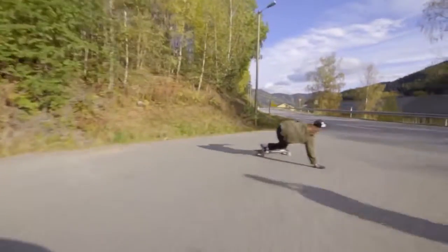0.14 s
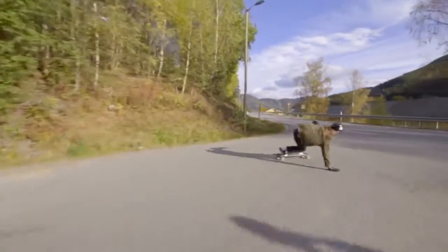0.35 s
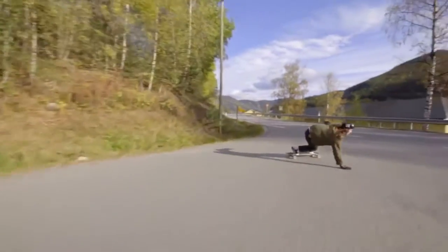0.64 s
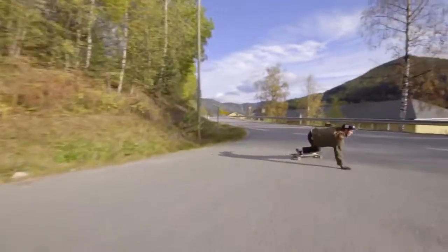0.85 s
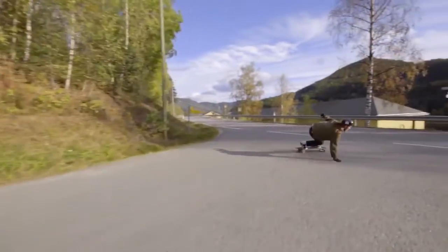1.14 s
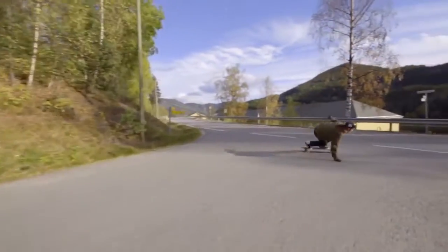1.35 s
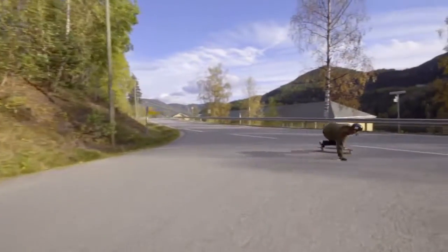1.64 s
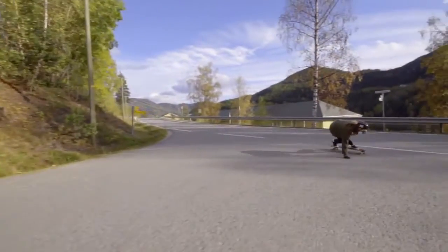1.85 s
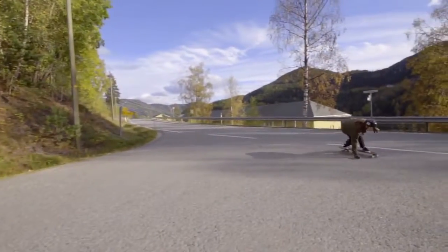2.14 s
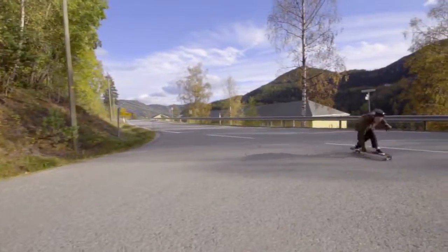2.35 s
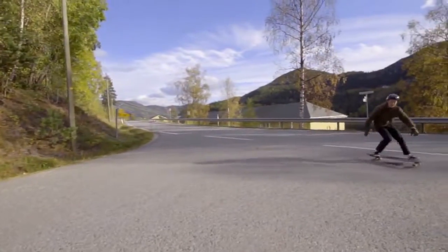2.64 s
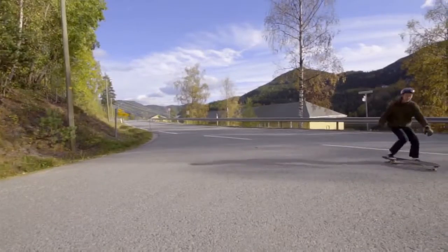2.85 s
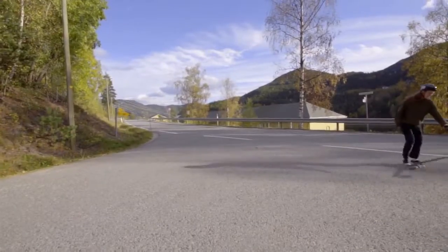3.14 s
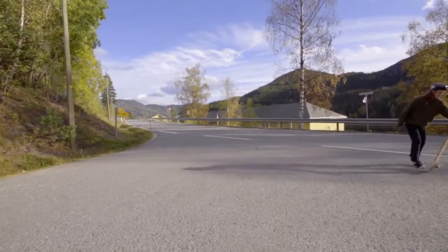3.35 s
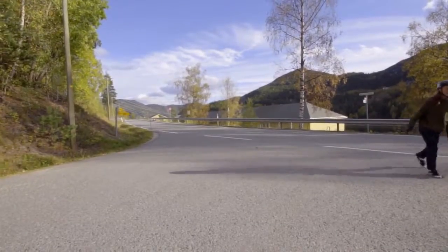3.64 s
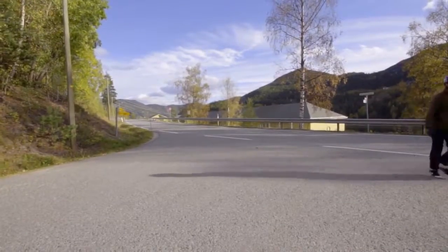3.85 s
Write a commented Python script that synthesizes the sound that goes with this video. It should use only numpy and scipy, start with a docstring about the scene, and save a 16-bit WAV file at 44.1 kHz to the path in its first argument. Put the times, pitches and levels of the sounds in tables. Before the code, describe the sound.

Longboard wheels hiss and crackle on gritty asphalt under strong wind buffeting close to the microphone; braking rubber groans, rolling stops near two seconds, then small clicks and wooden deck knocks over a low idling engine.

```python
"""Wind buffets two microphone ports separately: turbulent noise in lumps, with a few lone pops on the right.
Wheels of a longboard hiss and crackle over gritty asphalt, as resonated noise with crushed-grit bursts,
until they come to rest near 2 s; braking rubber groans as narrow-band noise. A few sharp struck clicks sound
during the rolling; more clicks and the deck knocks come after it, as the rider steps off.
Behind all of it an engine idles: harmonics of its firing rate and pulsing noise."""
import sys
import numpy as np
from scipy import signal
from scipy.fft import rfft, irfft
from scipy.io import wavfile
from scipy.ndimage import uniform_filter1d

SR = 44100
rng = np.random.default_rng(int(sys.argv[2]) if len(sys.argv) > 2 else 0)


def magnitude_from_level(level_db):
    """Linear magnitude for a level in decibels (20 dB per decade)."""
    exponent = np.asarray(level_db, float) / 20
    return 10 ** exponent


def to_wav(s):
    """Save 16-bit WAV."""
    ch = np.atleast_2d(s).T  # columns
    pcm = np.round(np.clip(ch, -1, 1) * 32767)  # PCM
    wavfile.write(sys.argv[1], SR, pcm.astype(np.int16))


N = 176400

# Wind strength at each port: time_s, level_db
WIND_LEFT = [(0, -20.5), (.03, -18), (.07, -15.5), (0.079, -25.5), (0.178, -19), (.27, -22.5), (.3, -30),
             (.34, -22.5), (.39, -30), (.43, -25.5), (.5, -28.5), (.54, -49), (0.582, -28), (.63, -55),
             (0.667, -26), (.71, -60.5)]
WIND_RIGHT = [(0, -37), (.35, -33), (.38, -34), (.46, -31.5), (.562, -40), (0.57, -28.5), (.66, -32),
              (.72, -37.5), (.8, -33), (.93, -36), (1.03, -39), (1.11, -38.5), (1.25, -46), (1.6, -43),
              (1.85, -52), (2.4, -79)]
# Relative spectrum of the wind at each port: frequency_hz, density_db
GUST_LEFT = [(20, -32.5), (130, -1), (180, -3.5), (450, -3.5), (800, -9.5), (1700, -23), (5000, -45),
             (9000, -83)]
GUST_RIGHT = [(20, -23.5), (130, -0.5), (300, 3), (450, -2.5), (750, -11), (1150, -27), (2500, -73)]
# Turbulent lumps, left row then right: rate_per_s, spread_db, brightening_db_per_db
EDDIES = [(150, 2, 0.19), (101, 2.5, 0.56)]
# Single strong eddies at the right port: centre_s, peak_db, pitch_hz
POPS = [(0.012, -16, 437), (0.028, -15.5, 417), (.057, -13, 436), (0.157, -21, 303), (0.251, -18, 310),
        (0.298, -16.5, 360), (0.308, -16.5, 366), (.592, -24, 700)]
# Strength of the rolling wheels: time_s, middle_level_db, treble_level_db
ROLL = [(0, -45, -57.5), (.45, -46, -55.5), (.8, -48.5, -57), (.86, -50.5, -58.5), (.93, -47, -59),
        (1.03, -50.5, -61), (1.09, -53, -62.5), (1.3, -55, -61.5), (1.5, -49.5, -61.5),
        (1.72, -56.5, -64.5), (1.92, -53, -59.5), (2.05, -72, -72)]
# Relative response of the wheels in the middle and in the treble: frequency_hz, gain_db
ROLL_MID = [(470, -33), (800, -22), (1150, -15), (1760, 2), (2270, -9.5), (2780, -3.5), (3490, -12.5),
            (4940, -67)]
ROLL_TOP = [(2060, -37), (3500, 2), (5640, -7), (7430, -13), (8690, -6.5), (10100, -13.5), (14000, -15),
            (15700, -19.5)]
# Port differences for wheels and clicks: frequency_hz, left_minus_right_db, left_lead_rad, likeness_0_to_1
ROLL_PORTS = [(800, -3, -1.4, 0.55), (2000, -0.5, -0.5, 0.63), (3500, -3, -3, 0.92),
              (5900, -11, -2.5, 0.44), (9000, -9, -2.5, 0.6), (15000, -11.5, -6.5, 0)]
# Centres of the grit bands: frequency_hz
GRIT_HZ = (1500, 2180, 3980, 7040, 11900)
# Groan of braking rubber: time_s, centre_hz, level_db
GROAN = [(1.3, 334, -60.5), (1.48, 318, -45.5), (1.66, 410, -53.5), (1.74, 400, -46.5), (1.85, 460, -44.5),
         (1.96, 420, -49.5), (2.05, 447, -60)]
# Clicks and knocks, before the port differences: start_s, peak_db, centre_hz, width_hz, length_s, left_lean_db
KNOCKS = [(0.49, -38, 5200, 3000, 0.006, -2.5), (1.084, -31, 5500, 5000, 0.0043, 10.5),
          (1.176, -49.5, 8640, 1200, .016, -2.5), (1.331, -37.5, 2900, 2000, 0.014, 5),
          (2.14, -53, 2880, 600, .003, 2), (2.156, -48.5, 2920, 450, 0.0044, 0),
          (2.198, -48.5, 9000, 1800, 0.004, -3), (2.2, -44, 3470, 2000, 0.015, 1),
          (2.223, -41, 4010, 800, 0.019, 2), (2.623, -45, 6400, 2000, 0.0044, 22.5),
          (3.305, -38, 1710, 1400, 0.0098, -2.5), (3.455, -43, 2600, 2800, 0.047, -2),
          (3.588, -37.5, 1420, 800, 0.018, 0)]
# Knocks on the wooden deck: start_s, peak_db
THUDS = [(3.461, -33), (3.469, -32), (3.485, -40), (3.515, -36), (3.591, -38)]
# Modes of the deck: pitch_hz, mean_relative_level_db, t60_s
DECK = [(280, -9, 0.05), (632, 1.5, 0.027), (1110, -4, 0.016), (2090, -19, 0.025)]
# Firing rate of the engine: time_s, rate_per_s
FIRING = [(0, 30.18), (2.3, 30.15), (2.55, 29.19), (2.8, 28.4), (3.1, 27.94), (4, 27.83)]
# Strength of the engine: time_s, hum_level_db, body_level_db, clatter_level_db
ENGINE = [(0, -60, -41.5, -55), (1.2, -59, -54, -57.5), (2.3, -58.5, -52, -57), (3.2, -55.5, -50.5, -56),
          (3.96, -57, -49, -55)]
# Partials of the hum: multiple_of_firing_rate, relative_level_db, lead_rad
ORDER = [(1, -23, 1.9), (2, 0, 2.7), (3, -7, 0), (9, -12, 2.4), (12, -9, 2.4)]
# Relative spectra of the engine noises: frequency_hz, gain_db
BODY = [(53, -31), (90, -4), (167, -14), (337, -5), (420, -4.5), (589, -2.5), (900, -16), (1170, -45)]
CLATTER = [(440, -12), (750, -8.5), (1080, -1), (1690, -11), (2000, -7.5), (2290, -13), (4300, -20.5),
           (5590, -52)]
HISS = [(3000, -45), (4400, -2), (6400, 0), (8300, -8), (13000, -12.5), (15800, -32)]
# Swell of each engine noise, one row: place_in_cycles, mean_depth_db, depth_spread_db
BODY_BEAT = (0.3, 3.5, .9)
CLATTER_BEAT = (0.16, 5.6, 1.5)
HISS_BEAT = (.17, 2.9, 1.)
# Port differences for the engine noises: frequency_hz, left_minus_right_db, left_lead_rad, likeness_0_to_1
ENGINE_PORTS = [(60.4, 0, 1, 0.99), (700, 2.5, -0.84, 1), (1260, 1, 0, 0.47), (2280, 0, -2.5, 0.87),
                (4400, -3, -2, 0.29), (14900, -2, -0.5, 0.089)]

SOFT_S, STRIKE = 0.0008, 5  # soft onset of a contact; strength of the strike against unit noise


def evened(x):
    """Normalisation: divides a signal by its effective value, giving rms 1."""
    return x / np.sqrt(np.mean(x ** 2) + 1e-20)


def over_time(rows):
    """Linear interpolation of breakpoint columns in time, one value per sample."""
    time_s, *columns = np.transpose(rows)
    return [np.interp(np.arange(N) / SR, time_s, column) for column in columns]


def over_hz(rows):
    """Interpolation of spectral columns on a logarithmic frequency axis, one value per bin."""
    hz, *columns = np.transpose(rows)
    bins = np.log(np.fft.rfftfreq(N, 1 / SR) + 1)
    return [np.interp(bins, np.log(hz + 1), column) for column in columns]


def coloured(x, spectrum):
    """Linear filtering: multiplies the spectrum by a gain curve; rms 1."""
    gain = magnitude_from_level(over_hz(spectrum)[0])
    return evened(irfft(rfft(x) * gain, N))


def lumps(smooth):
    """Low-pass random process: noise averaged twice over so many samples; rms 1."""
    once = uniform_filter1d(rng.standard_normal(N), int(smooth))
    return evened(uniform_filter1d(once, int(smooth)))


def ports(x, rows):
    """Partial coherence: two ports differ in level, phase and likeness; their mean has rms 1."""
    pan_db, lead, likeness = over_hz(rows)
    likeness = np.clip(likeness, 0, 1)
    a, b = rfft(x)
    left = a * magnitude_from_level(pan_db / 2) * np.exp(1j * lead)
    right = (likeness * a + np.sqrt(1 - likeness ** 2) * b) * magnitude_from_level(-pan_db / 2)
    pair = irfft([left, right], N)
    return pair / np.sqrt(np.mean(pair.mean(0) ** 2))


def clicks(per_s, spread_db):
    """Poisson-like impulses: sparse, of random sign, with exponentially spread sizes in dB."""
    on = rng.random(N) < per_s / SR
    size = np.minimum(rng.exponential(1, N), 4)
    sign = rng.choice([-1., 1.], N)
    return evened(on * sign * magnitude_from_level(spread_db * size))


def resonate(x, hz, width_hz):
    """Heterodyne resonator: low-passes around a carrier that may move; gain 1 at its centre."""
    turn = np.exp(2j * np.pi * np.cumsum(hz * np.ones(len(x))) / SR)
    r = np.exp(-np.pi * width_hz / SR)
    return 2 * (turn * signal.lfilter([1 - r], [1, -r], x / turn)).real


def turbulence(level, colour, eddies):
    """Turbulent pressure at one port: noise swells in lumps, and stronger lumps are brighter."""
    per_s, spread_db, brighten = eddies
    bright_hz, steady_s = 252, 0.0224
    lump_db = spread_db * 2 * np.tanh(lumps(SR / per_s) / 2)  # tanh limits the extremes
    level_db = over_time(level)[0]
    air = coloured(rng.standard_normal(N), colour)
    # partial levelling evens out short swells of the noise, so the wind follows its level curve
    air = air / np.sqrt(uniform_filter1d(air ** 2, int(steady_s * SR)) + 0.048)
    low = signal.sosfiltfilt(signal.butter(2, bright_hz, fs=SR, output="sos"), air)
    # brightness is relative to the strongest level of the first half second
    strength_db = level_db + lump_db - np.max(level_db[:SR // 2])
    high = (air - low) * magnitude_from_level(brighten * strength_db)
    blowing = np.arange(N) < level[-1][0] * SR
    return (low + high) * evened(magnitude_from_level(lump_db)) * magnitude_from_level(level_db) * blowing


def eddy_pops():
    """Isolated vortices: each pressure pop is a sine of random phase in a Gaussian envelope."""
    t, cycles, out = np.arange(N) / SR, 2.2, 0
    for centre_s, peak_db, hz in POPS:
        envelope = np.exp(-((t - centre_s) * hz / cycles * 2) ** 2)
        out = out + magnitude_from_level(peak_db) * envelope * np.sin(2 * np.pi * (hz * (t - centre_s) + rng.random()))
    return out


def wind():
    """Local turbulence: pressure fluctuations are independent at the ports; lone pops hit the right."""
    left = turbulence(WIND_LEFT, GUST_LEFT, EDDIES[0])
    right = turbulence(WIND_RIGHT, GUST_RIGHT, EDDIES[1])
    return np.array([left, right + eddy_pops()])


def grit_drive():
    """Contact excitation: each band flickers and takes decaying bursts where grit is crushed."""
    per_s, spread_db, share, decay_s, octaves = 150, 2, 0.35, 0.00082, 0.52
    flicker_db, patch_db = 1, 1.94  # flicker common to all bands, and of each band alone
    t, hz = np.arange(600) / SR, np.fft.rfftfreq(N, 1 / SR) + 1
    bells = np.array([np.exp(-(np.log2(hz / f) / octaves) ** 2) + 1e-9 for f in GRIT_HZ])
    common, drive = lumps(800), 0
    for bell in np.sqrt(bells / bells.sum(0)):  # the bands add up to even power
        impacts = abs(clicks(per_s, spread_db))
        grit = evened(signal.oaconvolve(impacts, np.exp(-t / decay_s))[:N])
        band_db = flicker_db * common + patch_db * lumps(1400)
        strength = (1 - share + share * grit) * magnitude_from_level(band_db)
        drive = drive + bell * rfft(rng.standard_normal((2, N)) * strength)
    return irfft(drive, N)


def wheels():
    """Source and filter: grit noise excites wheel resonances, which wander with the load."""
    mid_db, top_db = over_time(ROLL + [(ROLL[-1][0] + .05, -110, -110)])
    drive = grit_drive()
    # uneven reading speed shifts the middle resonances by 3.5 % rms
    place = np.cumsum(1 + 0.035 * lumps(3004)) % (N - 1)
    middle = [np.interp(place, np.arange(N), side) for side in coloured(drive, ROLL_MID)]
    treble = coloured(drive, ROLL_TOP)
    return magnitude_from_level(mid_db) * ports(middle, ROLL_PORTS) + magnitude_from_level(top_db) * ports(treble, ROLL_PORTS)


def groan():
    """Friction resonance: gripping rubber is noise in a narrow band whose centre wavers and rises overall."""
    width_hz = 245  # of each of two resonances in a row
    before = (GROAN[0][0] - .1, GROAN[0][1], -100)
    after = (GROAN[-1][0] + 0.039, GROAN[-1][1], -100)
    hz, level_db = over_time([before] + GROAN + [after])
    band = resonate(resonate(rng.standard_normal(N), hz, width_hz), hz, width_hz)
    lean_db = np.array([[1.2], [-1.2]])
    return evened(band * magnitude_from_level(1.85 * lumps(900))) * magnitude_from_level(level_db + lean_db)


def clicks_and_knocks():
    """Impact excitation: one strike and a short decaying crackle ring through two equal resonances."""
    out, noise = np.zeros((2, N)), rng.standard_normal((len(KNOCKS), 2, 4000))
    t, lean_db = np.arange(4000) / SR, np.zeros(N)
    strike = (t == t[round(SOFT_S * SR)]) * STRIKE
    for (start_s, peak_db, hz, width_hz, length_s, left_db), crackle in zip(KNOCKS, noise):
        start = round(start_s * SR)
        lean_db[start - 100:] = left_db  # holds until the next click
        envelope = (1 - np.exp(-t / SOFT_S)) * np.exp(-t / length_s * 2)
        for side in (0, 1):
            drive = envelope * crackle[side] + strike
            burst = resonate(resonate(drive, hz, width_hz), hz, width_hz)
            out[side, start:][:4000] += magnitude_from_level(peak_db) * burst / abs(burst).max()
    loudness = np.sqrt(np.mean(out ** 2))
    return ports(out, ROLL_PORTS) * loudness * magnitude_from_level([lean_db / 2, -lean_db / 2])


def deck_thuds():
    """Modal vibration: a knock on the wooden deck sounds as a sum of decaying sines."""
    out, t = np.zeros((2, N)), np.arange(4000) / SR
    for start_s, peak_db in THUDS:
        modes = 0
        for hz, db, t60 in DECK:
            mode_db = db + 2 * rng.standard_normal() - 60 * t / t60
            modes = modes + magnitude_from_level(mode_db) * np.sin(2 * np.pi * hz * t)
        ring = (1 - np.exp(-t / SOFT_S)) * modes
        start = round(start_s * SR)
        out[:, start:start + 4000] -= magnitude_from_level(peak_db) * ring / abs(ring).max()
    return out


def engine():
    """Periodic excitation: hum on multiples of the firing rate; body, clatter and hiss swell per firing."""
    turns = np.cumsum(over_time(FIRING)[0]) / SR  # firings so far
    hum_db, body_db, clatter_db = over_time(ENGINE)
    hiss_db = -68.5
    hum = np.sqrt(2) * sum(magnitude_from_level(db) * np.cos(2 * np.pi * k * turns + lead) for k, db, lead in ORDER)
    out = hum * magnitude_from_level(hum_db + np.array([[.9], [-.9]]))
    strength = rng.standard_normal(130)  # each firing differs; shared by the three noises
    layers = ((body_db, BODY, BODY_BEAT), (clatter_db, CLATTER, CLATTER_BEAT), (hiss_db, HISS, HISS_BEAT))
    for level_db, colour, (place, depth_db, spread_db) in layers:
        beat = ((1 + np.cos(2 * np.pi * (turns - place))) / 2) ** 1.5
        firing = np.floor(turns - place + 1.5).astype(int)
        swell_db = beat * (depth_db + spread_db * strength[firing])
        noise = rng.standard_normal((2, N)) * magnitude_from_level(swell_db)
        out = out + magnitude_from_level(level_db) * ports(coloured(noise, colour), ENGINE_PORTS)
    return out


def scene():
    """Superposition: the pressures of all sources add at the two ports."""
    return wind() + wheels() + groan() + clicks_and_knocks() + deck_thuds() + engine()


def roll_off(x):
    """The treble ends steeply here."""
    return signal.sosfilt(signal.butter(12, 15820, fs=SR, output="sos"), x)


def record(dry):
    """Gating: a linear fade of 1.3 ms brings the sound to silence at 3.957 s."""
    end_s, fade_s = 3.957, 0.0013
    gate = np.clip((end_s - np.arange(N) / SR) / fade_s, 0, 1)
    return roll_off(dry * gate)


dry = scene()
out = record(dry)
to_wav(out)
```